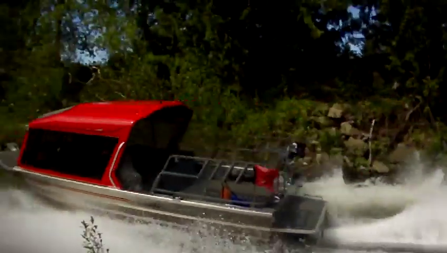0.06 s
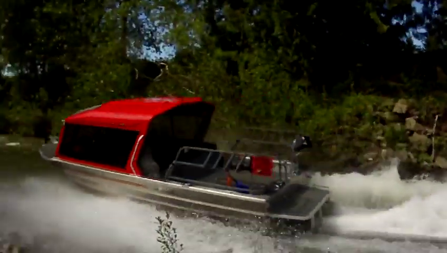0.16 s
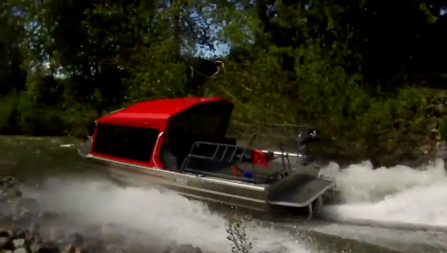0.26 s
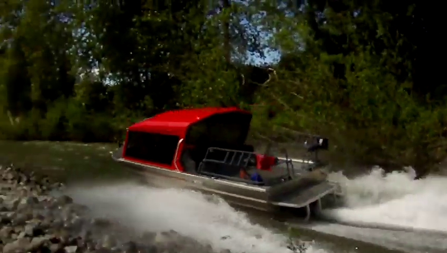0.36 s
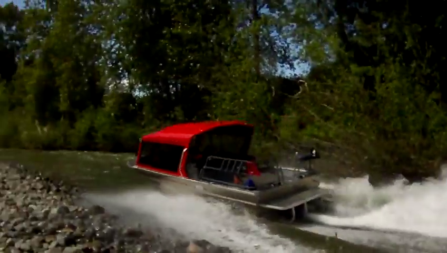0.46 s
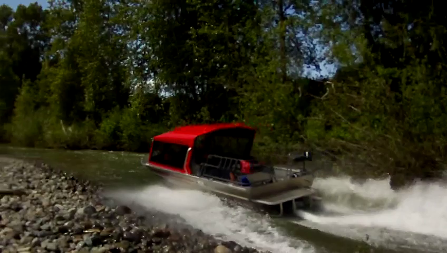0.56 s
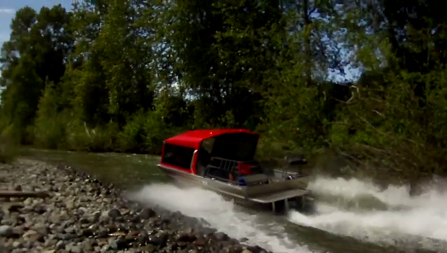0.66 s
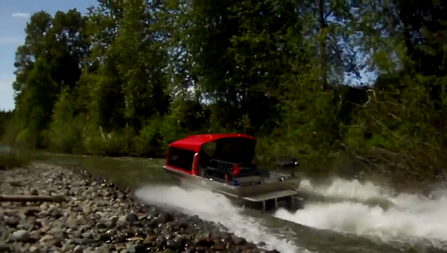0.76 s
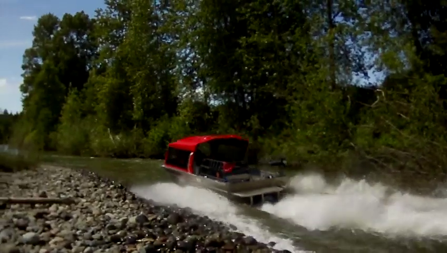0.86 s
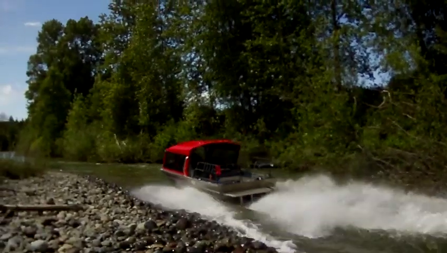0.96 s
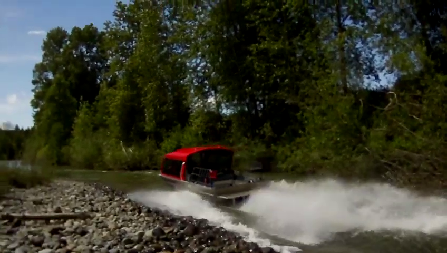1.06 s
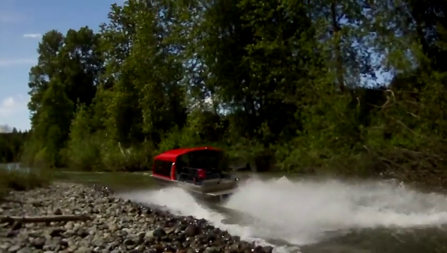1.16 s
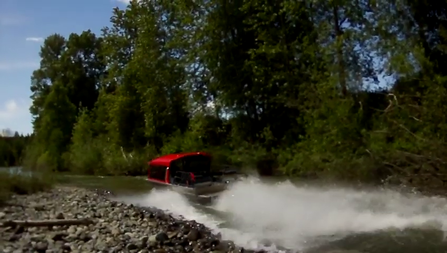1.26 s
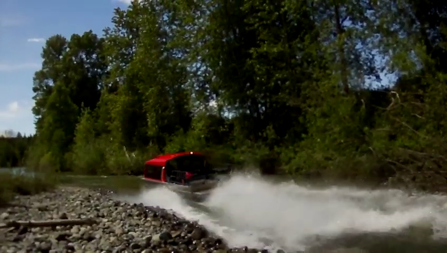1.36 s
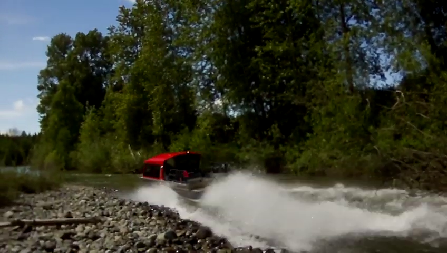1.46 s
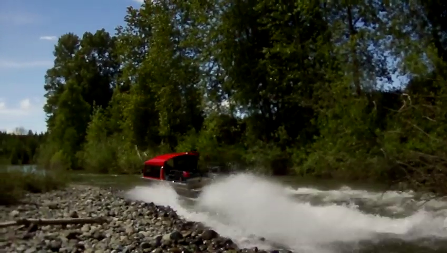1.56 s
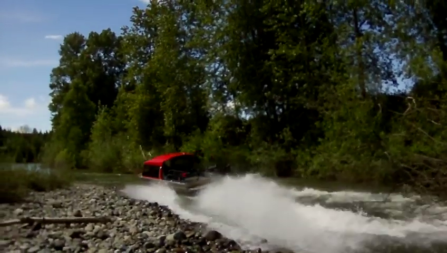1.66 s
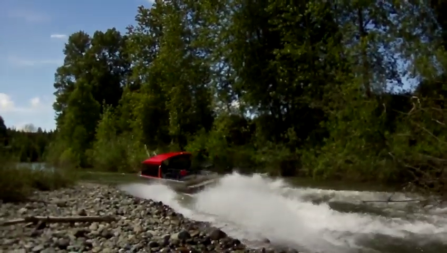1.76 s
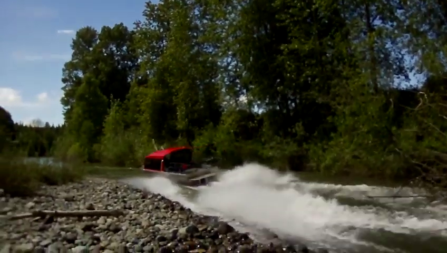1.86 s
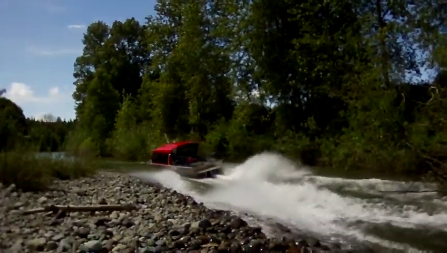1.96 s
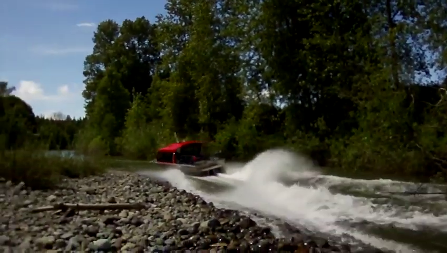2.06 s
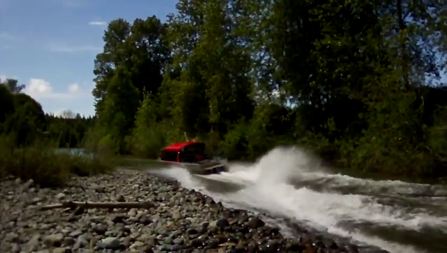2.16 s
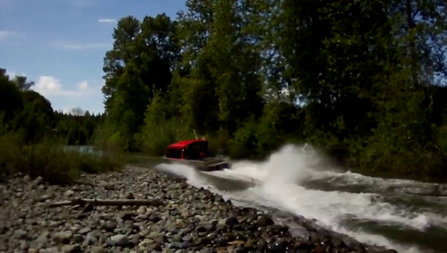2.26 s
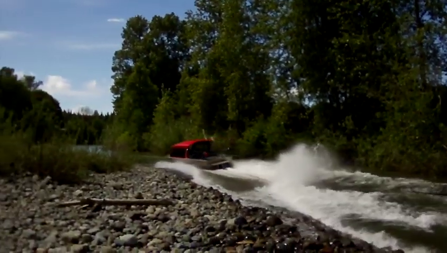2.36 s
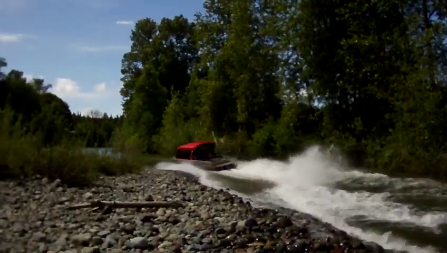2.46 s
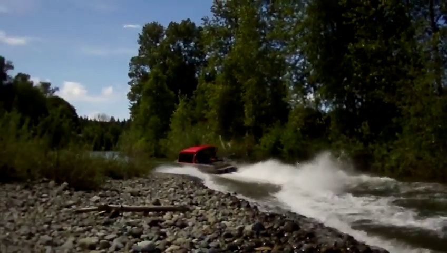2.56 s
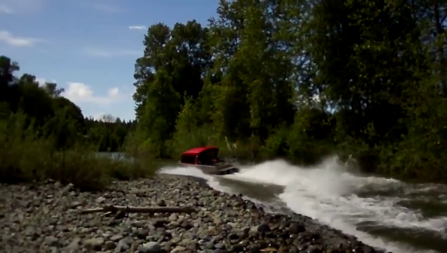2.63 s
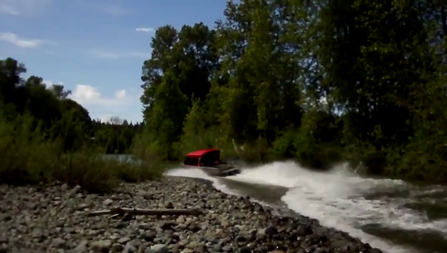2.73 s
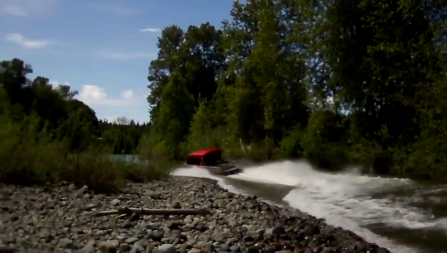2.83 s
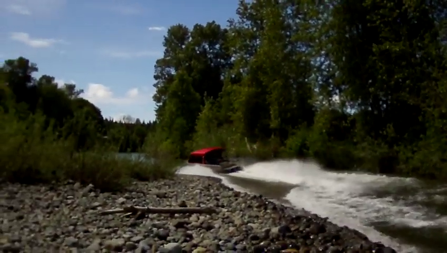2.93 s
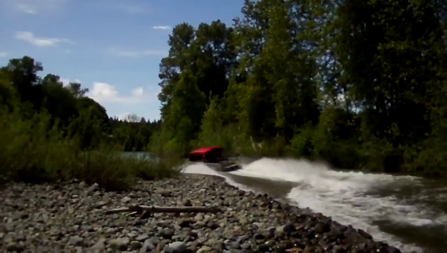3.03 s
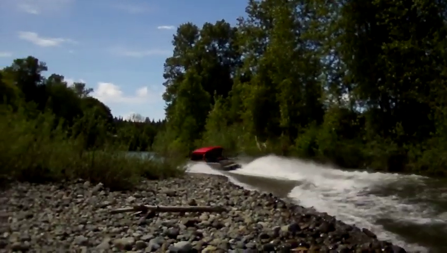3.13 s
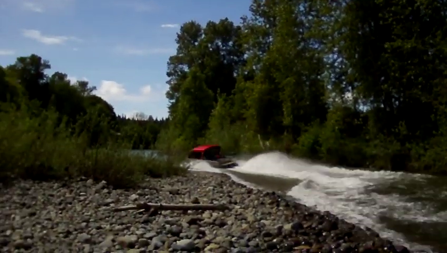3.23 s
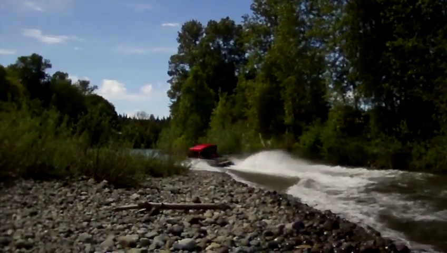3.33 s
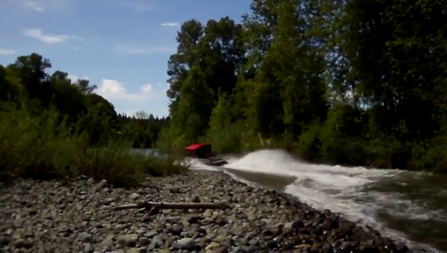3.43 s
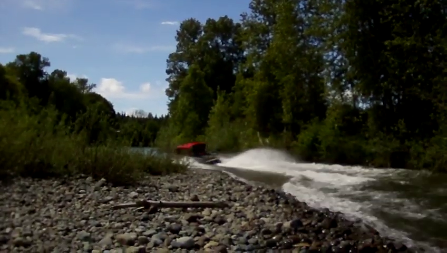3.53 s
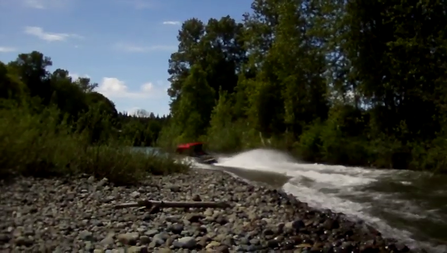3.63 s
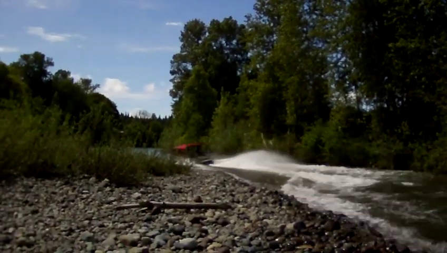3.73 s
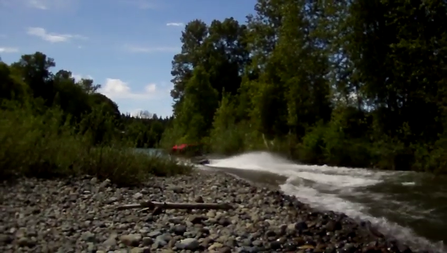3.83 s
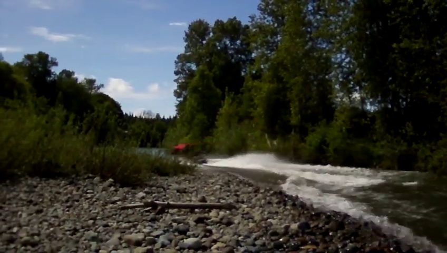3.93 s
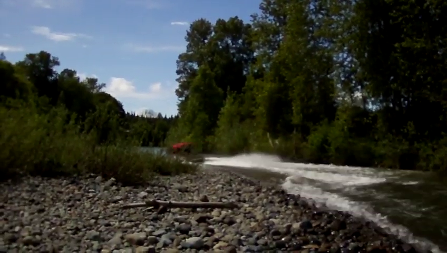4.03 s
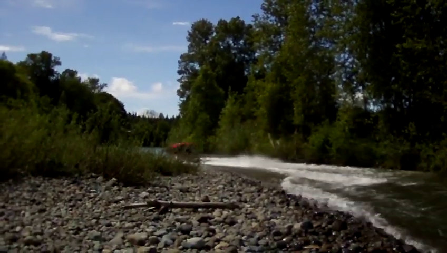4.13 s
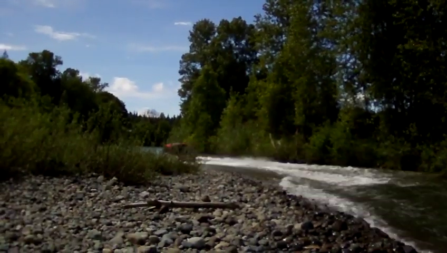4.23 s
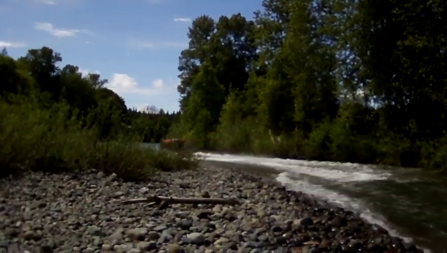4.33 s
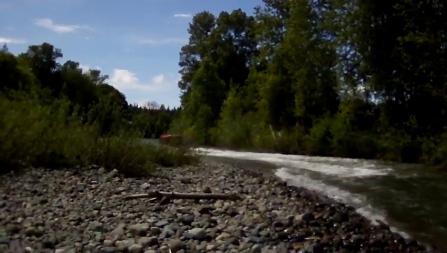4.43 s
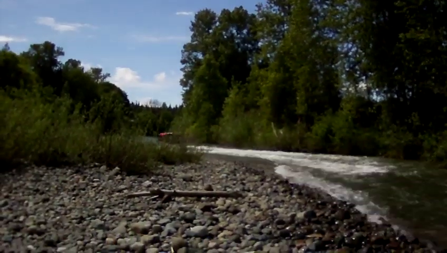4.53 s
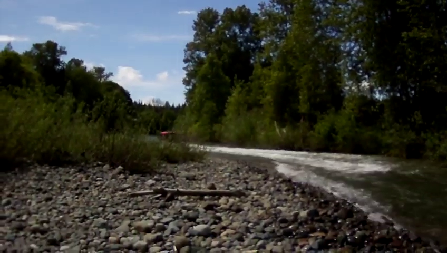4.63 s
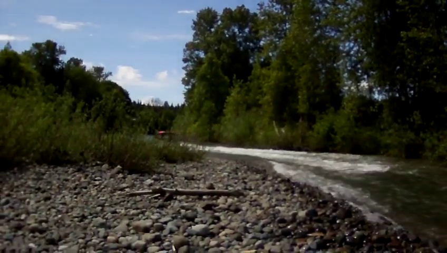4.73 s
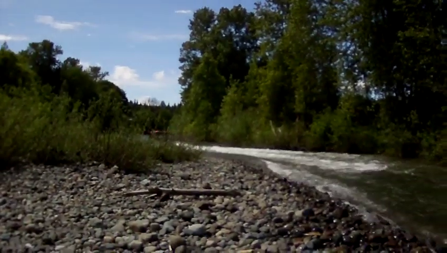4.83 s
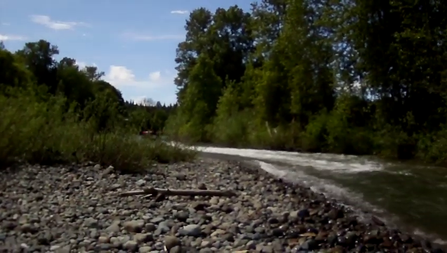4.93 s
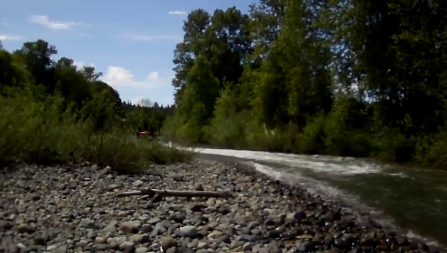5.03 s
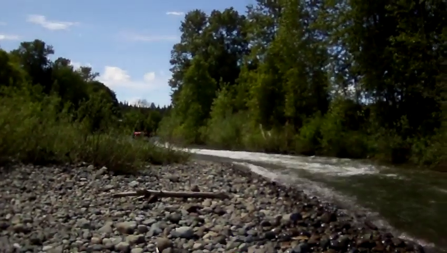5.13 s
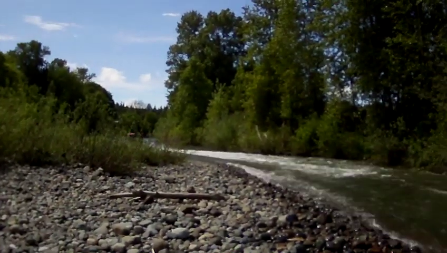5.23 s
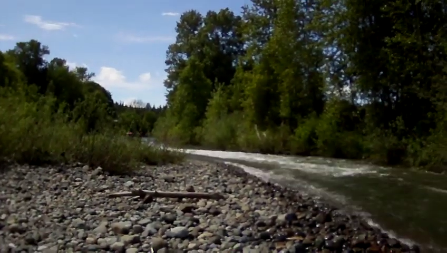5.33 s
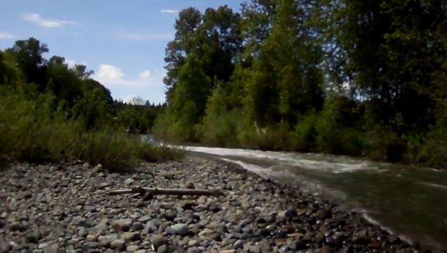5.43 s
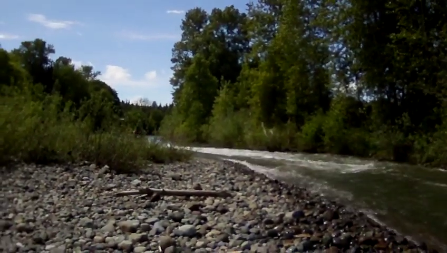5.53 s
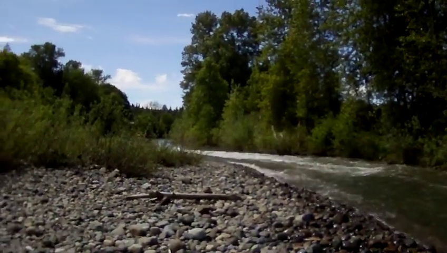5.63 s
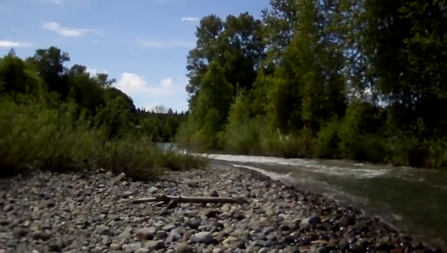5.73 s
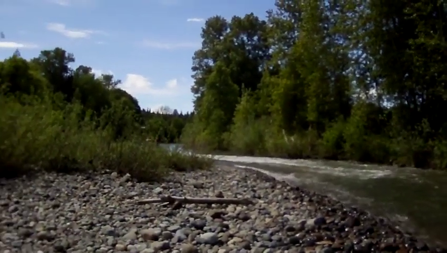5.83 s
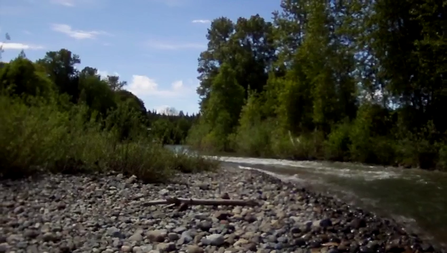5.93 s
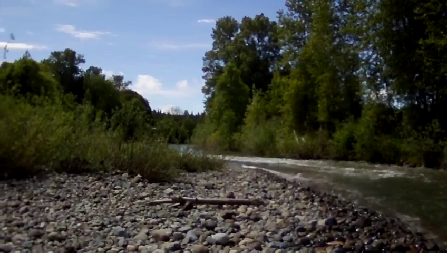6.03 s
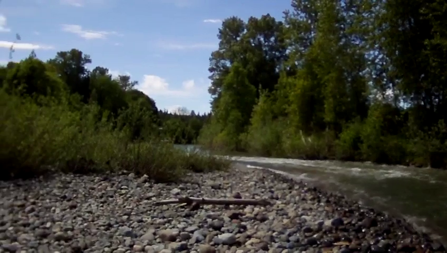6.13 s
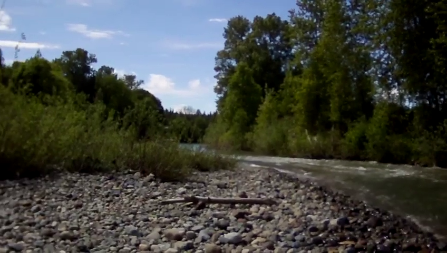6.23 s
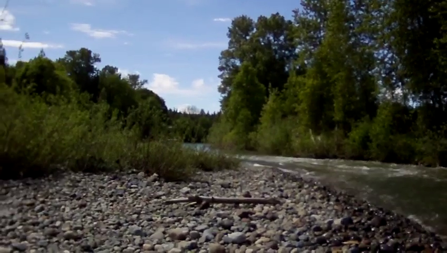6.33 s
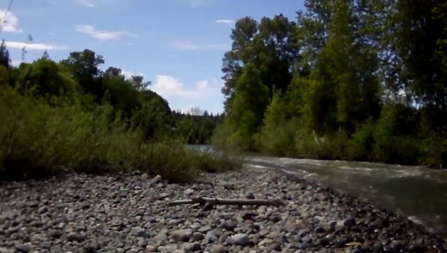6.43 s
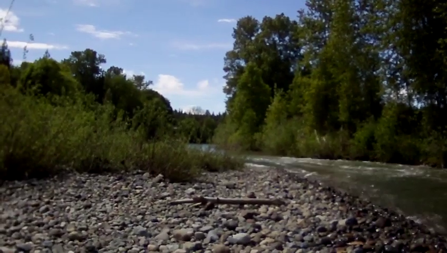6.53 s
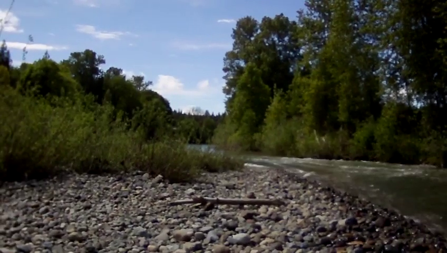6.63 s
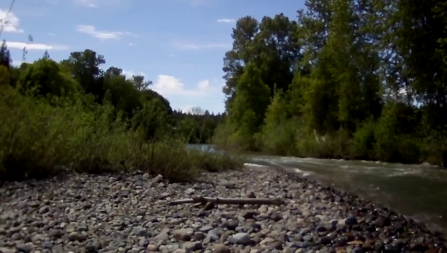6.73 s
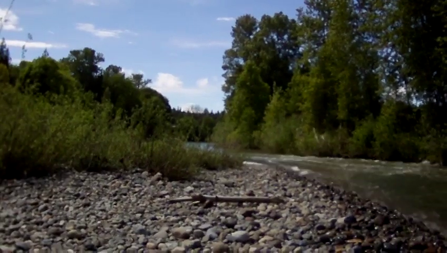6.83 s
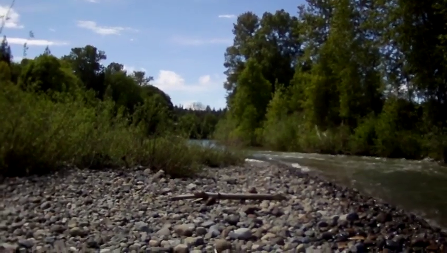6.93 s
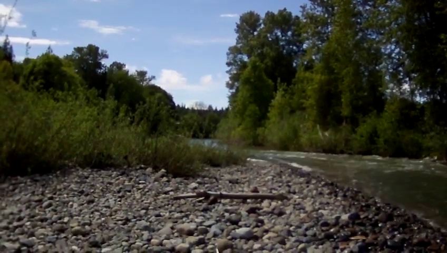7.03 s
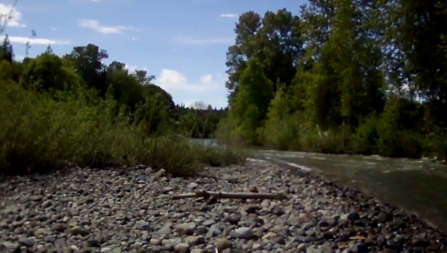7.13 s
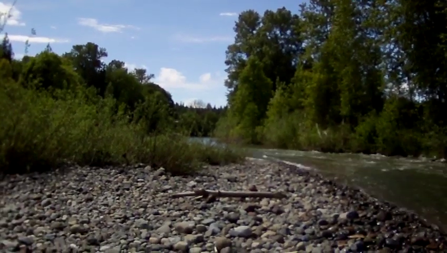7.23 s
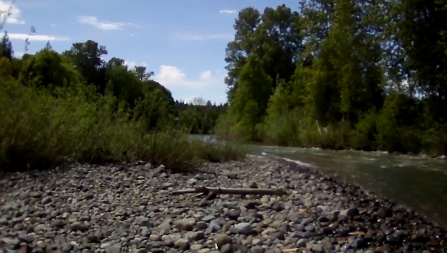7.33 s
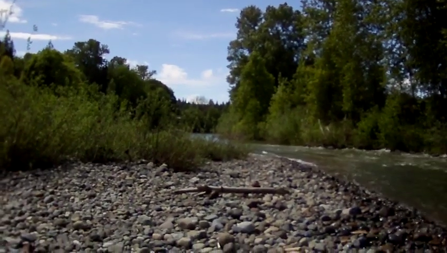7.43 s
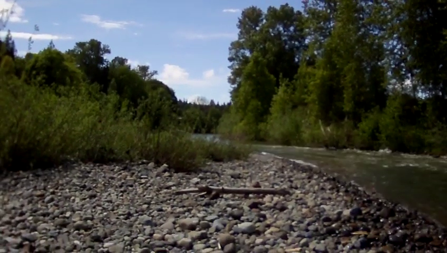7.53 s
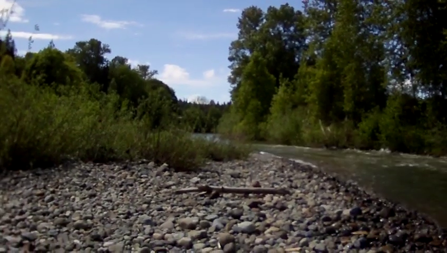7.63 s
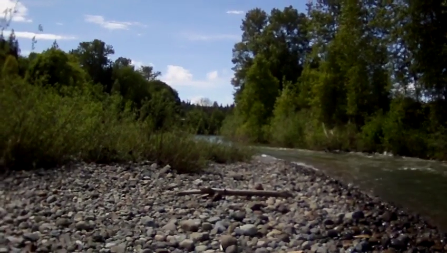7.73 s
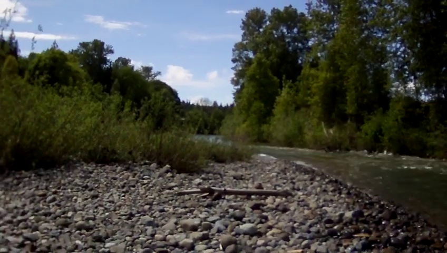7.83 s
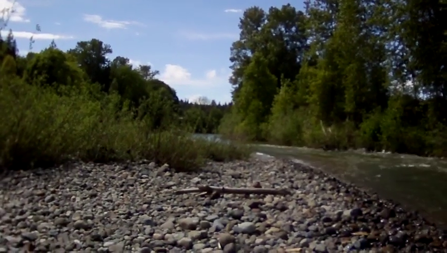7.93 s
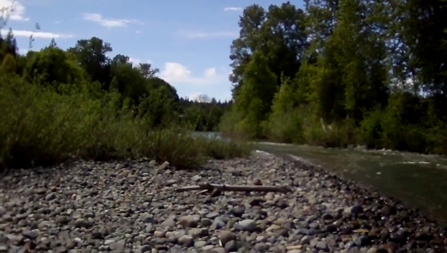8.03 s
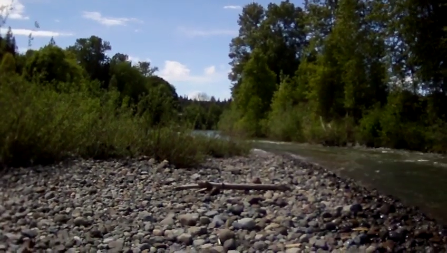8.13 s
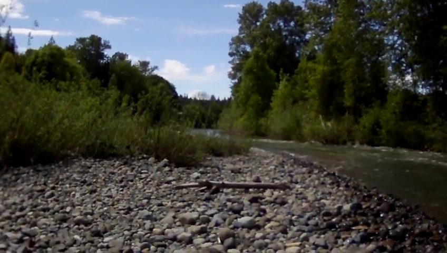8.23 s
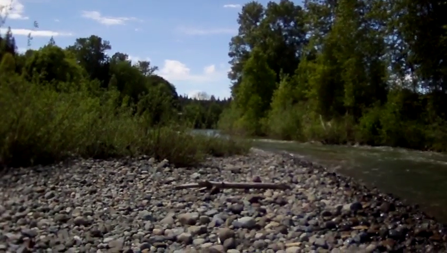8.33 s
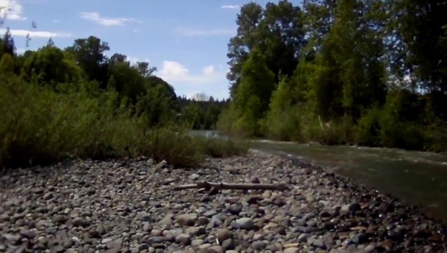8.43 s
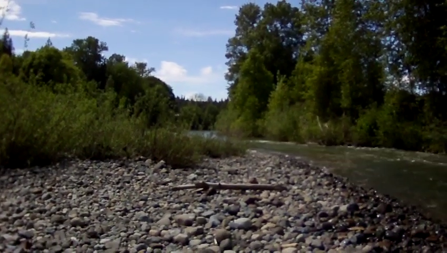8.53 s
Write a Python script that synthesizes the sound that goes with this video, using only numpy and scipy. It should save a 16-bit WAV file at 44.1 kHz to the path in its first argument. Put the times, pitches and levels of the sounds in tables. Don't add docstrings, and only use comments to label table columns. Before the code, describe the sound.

Outdoors on a riverbank, a single fixed microphone hears a powerful boat engine leaving from close by. Lumpy, rasping exhaust sits inside a thick rush of broken water and bright spray. The engine pitch rises, drops sharply, surges again and sinks as the boat rounds bends. Everything becomes softer and duller, with brief throttle gaps, until a distant low burble, gentle water hiss and a very faint electronic whine remain.

```python
import sys
import numpy as np
from scipy import signal
from scipy.fft import rfft, irfft
from scipy.io import wavfile
from scipy.ndimage import uniform_filter1d

SR = 44100
rng = np.random.default_rng(int(sys.argv[2]) if len(sys.argv) > 2 else 0)


def master(y):
    cut = np.clip(np.atleast_2d(y).T, -1, 1)
    pcm = np.round(cut * 32767)
    wavfile.write(sys.argv[1], SR, pcm.astype(np.int16))


def nominal_scale(level):
    x = np.asarray(level, float) / 20
    return 10 ** x


N = 378378

# t/s, level/dB, rise/s, fall/s
GUSTS = [(0., -52, 0.025, .05), (.8, -56, 0.52, 0.24), (1.3, -62, .07, .15), (1.7, -62, 0.13, .5),
         (2.6, -70, .1, .3), (3.3, -71, .3, .35), (4.1, -78, .08, .15), (4.65, -82, .25, .15),
         (5.6, -59, .04, .13), (6.32, -82, .1, .8), (7.95, -69, 0.28, .2), (8.58, -69, .1, .1)]
# f/Hz, level/dB
RUSH_SPECTRUM = [(70, -12), (150, 0), (300, -6), (400, -5.5), (560, 1.5), (800, -9), (1200, -22),
                 (1600, -21.5)]
# f/Hz, level/dB
HISS_SPECTRUM = [(800, -40), (1250, -37), (1600, -9), (2100, -1), (2550, 0), (2780, -9.5), (3200, -1),
                 (3850, 1.5), (4350, -5.5), (4750, -23), (5500, -34)]
# f/Hz, level/dB
WASH_SPECTRUM = [(800, -10.5), (1220, -11.5), (1800, 2), (2100, -2), (2550, 0.5), (2780, -13), (3200, -5.5),
                 (3950, -4), (4350, -12), (4750, -21.5), (5500, -26)]
# f/Hz, level/dB
SPRAY_SPECTRUM = [(4200, 3), (4900, -1), (5700, -1), (6500, 3), (7300, -4.5), (8200, -3), (10000, -7),
                  (12000, -11), (15000, -17)]
# t/s, level/dB
AWAY = [(0, -1.5), (.06, -1), (.13, -2), (.45, -4.5), (.76, -7), (.95, -6), (1.3, -8.5), (2, -11), (3, -15),
        (4.3, -21), (5, -24), (6, -25.5), (7, -36), (8.58, -26.5)]
# place/cycle, level at t = 0/dB, change/(dB/s), end t/s
FRONTS = [
    (0.039, -26, 2.3, 1.097),
    (.064, -31, -4.5, 1.3),
    (.345, -28, -8, 0.63),
    (0.664, -24.5, 6, 0.686),
]
# t/s, f/(cycles/s)
SPEED = [(0.0, 22.81), (0.86, 22.42), (1.28, 26.46), (2.48, 26.9), (2.88, 18.78), (3.42, 24.43),
         (4.08, 19.82), (4.38, 14.14), (4.68, 13.24), (4.74, 13.38), (5.28, 21.47), (5.52, 18.28),
         (6.22, 12.18), (6.74, 11.55), (7.14, 11.87), (7.66, 17.33), (8.38, 17.2), (8.58, 20.05)]
# t/s, level/dB, even firing (lift of order 8)/dB
EXHAUST = [(0, -39, -2), (.7, -40, 2.5), (1, -42, -0.5), (1.8, -39.5, 13.5), (2.4, -43.5, 18.5),
           (2.7, -44, 1), (3, -42, -4.5), (3.2, -38, -13.5), (3.7, -44.5, -4.5), (3.9, -49.5, -2.5),
           (4.1, -49.5, 3), (4.5, -43.5, -12.5), (5, -49.5, -0.5), (5.7, -53, 3), (6.1, -55, -1.5),
           (7, -52.5, -12), (7.7, -49, -1.5), (8.58, -64.5, 12)]
# t/s, level/dB, length/s
MISFIRES = [
    (3.1, -5, .03),
    (3.87, -9, .03),
    (5.125, -15, .025),
    (5.515, -17, .02),
    (5.74, -8, .01),
    (5.8, -9, .01),
    (5.86, -6, .01),
    (5.92, -8, .015),
    (6.2, -5, .02),
]
# t/s, level/dB, length/s
STERN_SWINGS = [
    (.75, 6, 0.45),
    (2.3, 4.5, 0.32),
    (3.45, 12.5, 0.39),
    (4.05, 8.5, 0.29),
    (5.1, 4, 0.35),
    (5.9, 3.5, 0.18),
    (7.3, 9, .25),
]
# f/Hz, level/dB
PIPE = [(40, -35), (65, -29), (90, -15.5), (110, -4), (200, 1.5), (300, -0.5), (380, -3), (450, 7.5),
        (560, -11), (750, -19), (1100, -48)]
# f/Hz, level/dB
PATH_NEAR = [(110, 3.5), (135, 6.5), (180, 12.5), (195, -6), (215, -22), (250, 6.5), (340, -0.5),
             (430, -14)]
# f/Hz, level/dB
PATH_FAR = [(60, -18), (95, -4), (125, 2), (150, 6), (175, 1), (200, 0), (270, 0.5), (330, -6)]
# order, level before bend/dB, level after/dB, change behind bushes/dB, share of even-firing lift
STRONG = [
    (5, 9, -6, 0.5, -0.25),
    (8, 1.55, 7.5, 1.24, 0.94),
    (11, -2.5, -5, .1, -0.22),
    (13, -2, -3, -8, 0.098),
    (16, 6.9, -2.5, .1, 0.13),
]
# order, level before bend/dB, level after/dB, level behind bushes/dB
MINOR = [(2, 10, 1.5, 3), (3, 9, 4, 7), (4, 11.5, 10.5, 10), (6, 3.5, 6, 1), (7, 5, 4.5, -1),
         (9, -11, -6, 1.5), (10, -1, -6, -2.5), (12, 0, -6.5, -8.5), (14, -8, -10, 1), (15, 2.7, -8, -3.5)]
# f/Hz, level/dB
WHINE = [(11268, -88), (12000, -95), (14865, -96), (14925, -91), (14985, -82), (15045, -87)]

BEND_S, BEND_TAKES_S = 2.5, 0.29
HIDDEN_S, HIDING_TAKES_S = 3.88, 1.
ONE_BLOW_S = 2.95
FLYWHEEL_S = .22
RING_HZ, RING_WIDTH_HZ = 450, 120


def rms_one(x):
    return x / np.sqrt(np.mean(x ** 2) + 1e-20)


def in_time(rows):
    s, *columns = np.transpose(rows)
    return [np.interp(np.arange(N) / SR, s, c) for c in columns]


def at_hz(points, hz):
    f, db = np.array(points).T
    return np.interp(np.log(hz), np.log(f), db)


def bumps(rows):
    t = np.arange(N) / SR
    return sum(height * np.exp(-((t - s) / length) ** 2) for s, height, length in rows)


def drift(rate):
    r = np.exp(-80 * np.pi * rate / SR)
    noise = rng.standard_normal(N // 40 + 2002)
    slow = signal.lfilter([1], [1, -2 * r, r * r], noise)[2000:]
    return np.interp(np.arange(N) / 40, np.arange(len(slow)), rms_one(slow))


def band(x, low_hz, high_hz):
    return signal.sosfilt(signal.butter(2, [low_hz, high_hz], "band", fs=SR, output="sos"), x)


def coloured(x, spectrum):
    hz = np.maximum(np.arange(N // 2 + 1) * SR / N, 1)
    inside = (hz > spectrum[0][0]) & (hz < spectrum[-1][0])
    return rms_one(irfft(rfft(x) * nominal_scale(at_hz(spectrum, hz)) * inside, N))


def wind():
    t = np.arange(N) / SR
    gusts = nominal_scale(-84)
    for s, db, rise, fall in GUSTS:
        gusts = gusts + nominal_scale(db) * np.exp(-((t - s) / np.where(t < s, rise, fall)) ** 2)
    rumble = rms_one(band(band(rng.standard_normal(N), 22, 70), 25, 80))
    return gusts * nominal_scale(1.5 * drift(7.4)) * rumble


def splashing(spectrum, drops_per_s, drop_db, patchy_db):
    sizes = nominal_scale(2.63 * np.minimum(rng.exponential(1, N), 5)) * rng.choice([-1, 1], N)
    drops = rms_one(sizes * (rng.random(N) < drops_per_s / SR))
    whole = rfft(coloured(rng.standard_normal(N) + nominal_scale(drop_db) * drops, spectrum))
    third = np.round(3 * np.log2(np.maximum(np.arange(len(whole)) * SR / N, 1)))
    together = drift(11.0)
    out = np.zeros(N)
    for k in np.unique(third[np.abs(whole) > 0]):
        flicker_db = patchy_db * (0.71 * together + drift(15.0))
        out += nominal_scale(flicker_db) * irfft(whole * (third == k), N)
    return rms_one(out)


def water():
    away_db = in_time(AWAY)[0]

    def gain(boat_db, follows, river_db):
        return np.hypot(nominal_scale(boat_db + follows * away_db), nominal_scale(river_db))

    rush = splashing(RUSH_SPECTRUM, drops_per_s=510.0, drop_db=-8, patchy_db=0.5)
    rush *= gain(boat_db=-30.5, follows=1, river_db=-50)
    hiss = splashing(HISS_SPECTRUM, drops_per_s=1400.0, drop_db=-7, patchy_db=0.97)
    hiss *= gain(boat_db=-36, follows=1.114, river_db=-90)
    arrived = np.clip(np.arange(N) / SR / 0.069, .15, 1)
    wash = splashing(WASH_SPECTRUM, drops_per_s=900., drop_db=-10, patchy_db=0.37)
    wash *= arrived * gain(boat_db=-48, follows=0.75, river_db=-56.5)
    spray = splashing(SPRAY_SPECTRUM, drops_per_s=2500., drop_db=-4, patchy_db=0.5)
    spray *= gain(boat_db=-40, follows=1.16, river_db=-64)
    finest = signal.sosfilt(signal.butter(1, 10200, "high", fs=SR, output="sos"), spray)
    absorbed = (1 - nominal_scale(0.86 * away_db)) * finest
    return rush + hiss + wash + spray - absorbed


def cracks(turns):
    fronts = np.zeros(N)
    for place, start_db, fade, until in FRONTS:
        at = np.flatnonzero(np.diff(np.floor(turns - place)))
        s = at / SR
        db = start_db + fade * s - 330 * np.maximum(s - until, 0)
        uneven_db = 2.2 * rng.standard_normal(N // 1000)[:len(at)]
        fronts[at] += nominal_scale(np.maximum(db, -53) + uneven_db)
    ms = np.arange(-200, 200) * 1000 / SR
    shape = np.tanh(ms / 0.099) * np.exp(-np.abs(ms))
    return band(np.convolve(fronts, shape, "same"), 480, 2100) * nominal_scale(3)


def order_levels(cycle_hz, turned, hidden):
    away_db = in_time(AWAY)[0]
    exhaust_db, even_db = in_time(EXHAUST)
    stern_db = bumps(STERN_SWINGS)
    low_db = -42 + 0.62 * away_db + 0.35 * stern_db
    high_db = -48.5 + 1.046 * away_db + stern_db
    upper = {k: high_db + at_hz(PIPE, k * cycle_hz) for k in range(17, 42)}
    minor, strong = {}, {}
    for order, near_db, far_db, hidden_db in MINOR:
        k = round(order)
        strength_db = (1 - turned) * near_db + (turned - hidden) * far_db + hidden * hidden_db
        minor[k] = low_db + strength_db + at_hz(PIPE, k * cycle_hz)
    for order, near_db, far_db, hidden_db, share in STRONG:
        k = round(order)
        near = near_db + at_hz(PATH_NEAR, k * cycle_hz)
        far = far_db + at_hz(PATH_FAR, k * cycle_hz)
        strong[k] = exhaust_db + even_db * share + hidden * hidden_db + (1 - turned) * near + turned * far
    return {**upper, **minor}, strong


def engine():
    inertia = int(FLYWHEEL_S * SR)
    cycle_hz = in_time(SPEED)[0]
    for _ in range(2):
        cycle_hz = uniform_filter1d(cycle_hz, inertia, mode="nearest")
    turns = np.cumsum(cycle_hz) / SR
    t = np.arange(N) / SR
    turned = np.clip((t - BEND_S) / BEND_TAKES_S, 0, 1)
    hidden = np.clip((t - HIDDEN_S) / HIDING_TAKES_S, 0, 1)
    in_step = np.clip((t - ONE_BLOW_S) / BEND_TAKES_S, 0, 1)
    weak_orders, strong_orders = order_levels(cycle_hz, turned, hidden)
    scatter = np.minimum(.04 + .2 * np.maximum(t - 3.55, 0), .25)
    gaps_db = bumps(MISFIRES)
    out = np.zeros(N)
    for k, db in {**weak_orders, **strong_orders}.items():
        weak = k not in strong_orders
        waver_db = (.5 + 2.0 * weak + 1.5 * hidden * (k not in (5, 8))) * drift(3.54)
        slip = (.008 + .002 * k * weak) * drift(3)
        slip = slip + scatter * rng.standard_normal() + .08 * weak * rng.standard_normal()
        lag = np.arctan((k * cycle_hz - RING_HZ) / RING_WIDTH_HZ) / np.pi
        line = np.cos(2 * np.pi * (k * (turns - .04) + .32 - lag + slip))
        if 5 <= k <= 16:
            near = np.cos(2 * np.pi * (k * (turns - .5) - .22 + slip)) if k > 8 else line
            far = np.cos(2 * np.pi * (k * (turns - .07) - .22 + slip))
            line = np.sqrt(1 - in_step) * near + np.sqrt(in_step) * far
        out += nominal_scale(db + waver_db + gaps_db * (k < 10)) * line
    return np.sqrt(2) * out, turns


def scene():
    exhaust, turns = engine()
    return (exhaust + cracks(turns) + water() + wind())[None]


def top_cut(x):
    return signal.sosfilt(signal.butter(12, 15110, fs=SR, output="sos"), x)


def record(dry):
    t = np.arange(N) / SR
    whine = np.zeros(N)
    for hz, db in WHINE:
        whine += nominal_scale(db + .8 * drift(6)) * np.sqrt(2) * np.sin(2 * np.pi * hz * t)
    whine *= np.clip((t - 3.7) / .8, 0, 1)
    hiss = nominal_scale(-79) * rms_one(band(rng.standard_normal(N), 9000, 16000))
    top_end = signal.cheby2(10, 60, 15400, fs=SR, output="sos")
    air = signal.sosfilt(top_end, dry + hiss)
    return top_cut(air + whine)


dry = scene()
out = record(dry)
master(out)
```